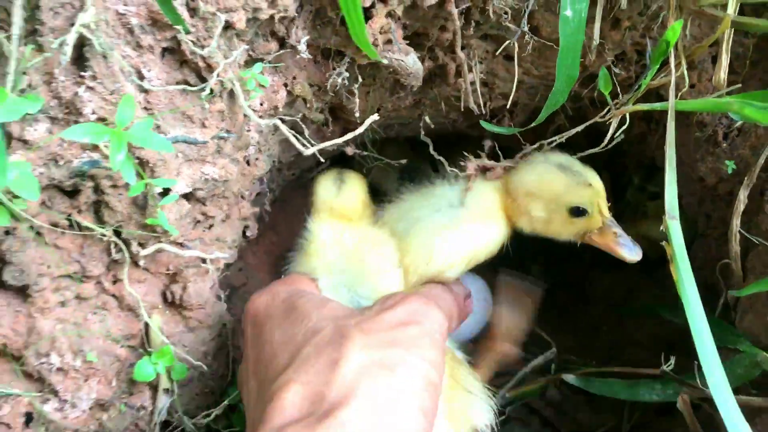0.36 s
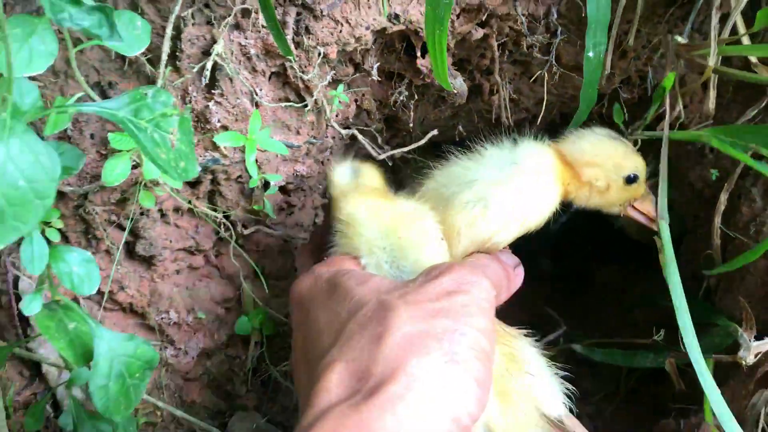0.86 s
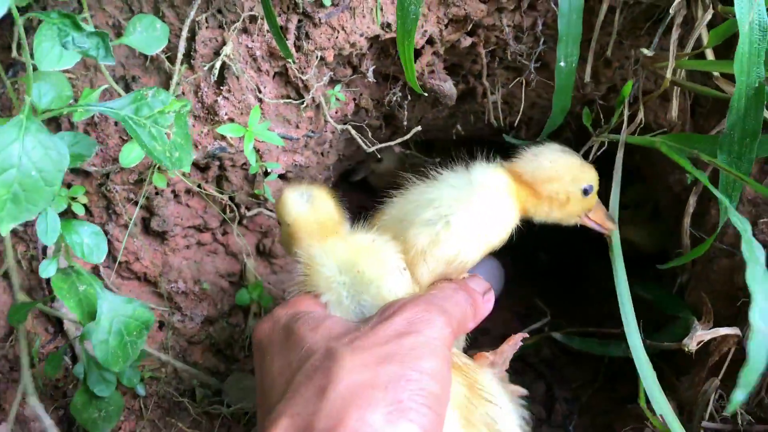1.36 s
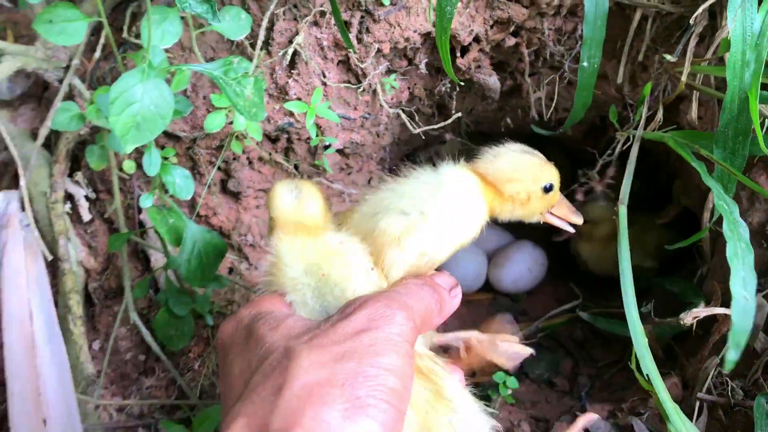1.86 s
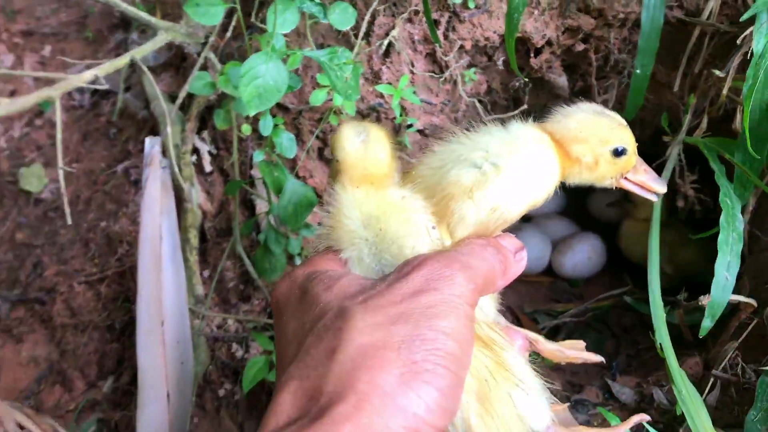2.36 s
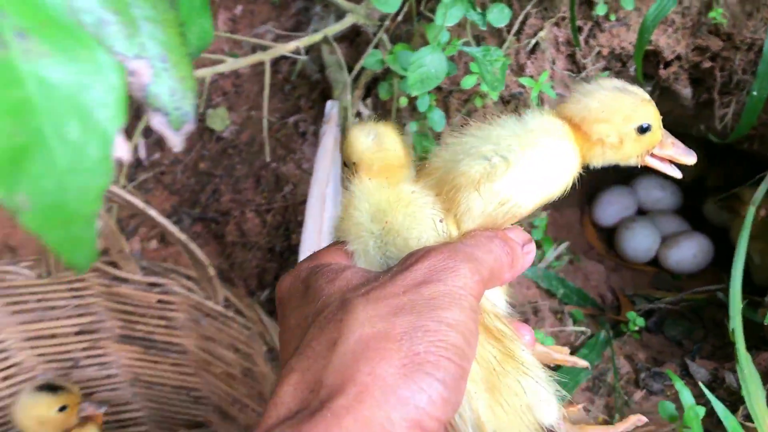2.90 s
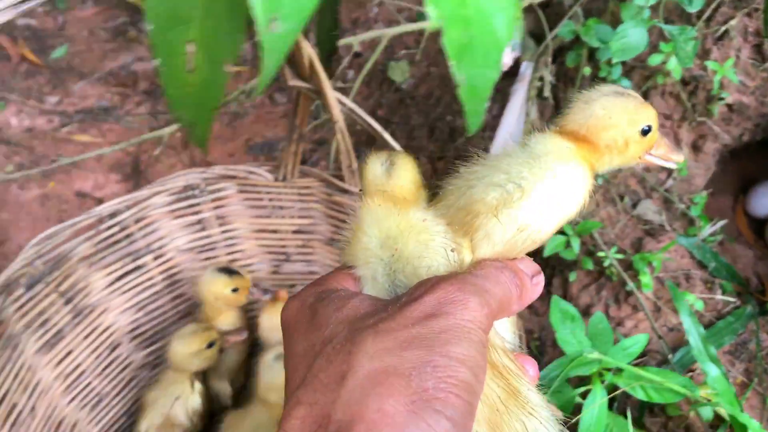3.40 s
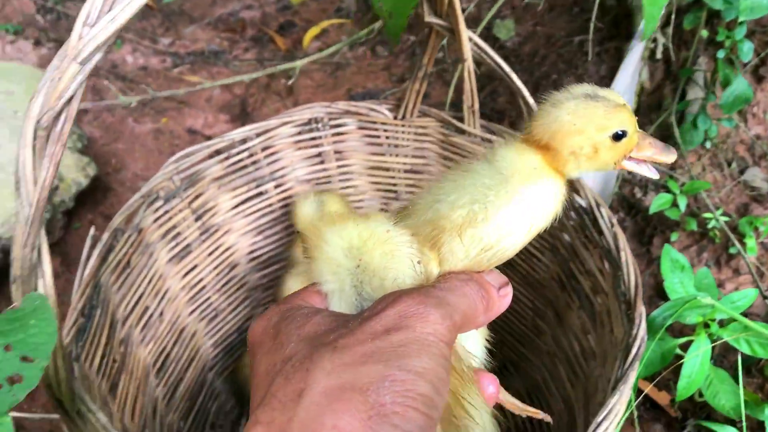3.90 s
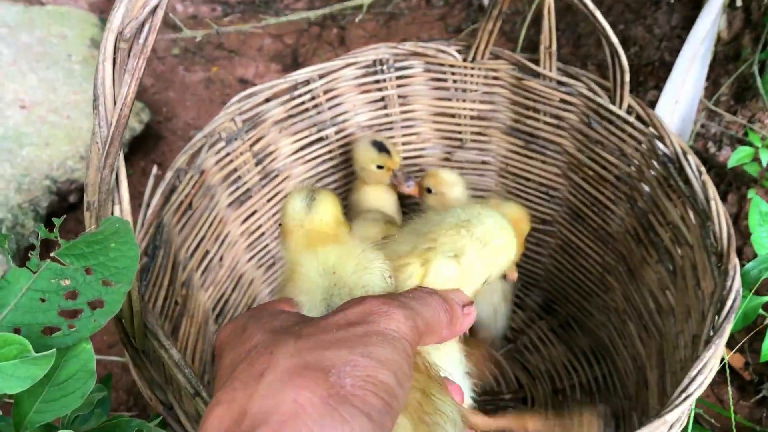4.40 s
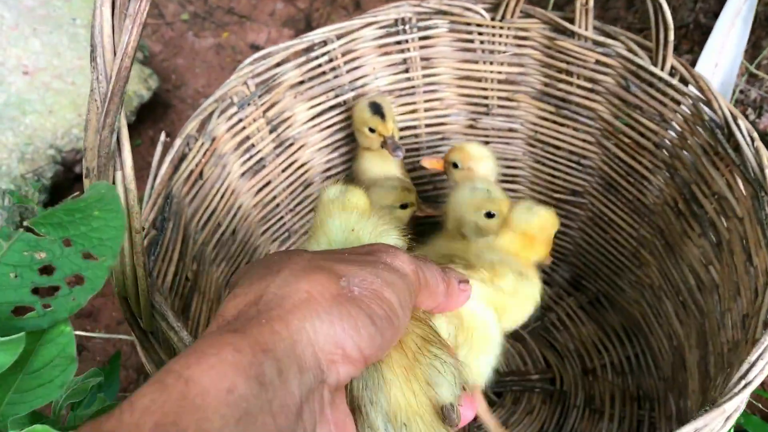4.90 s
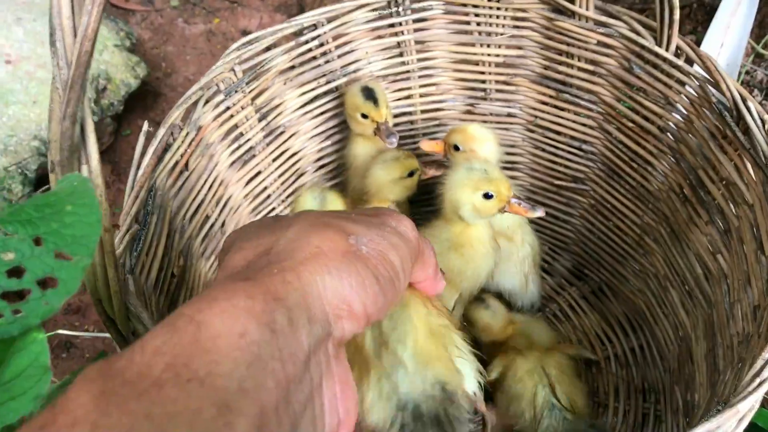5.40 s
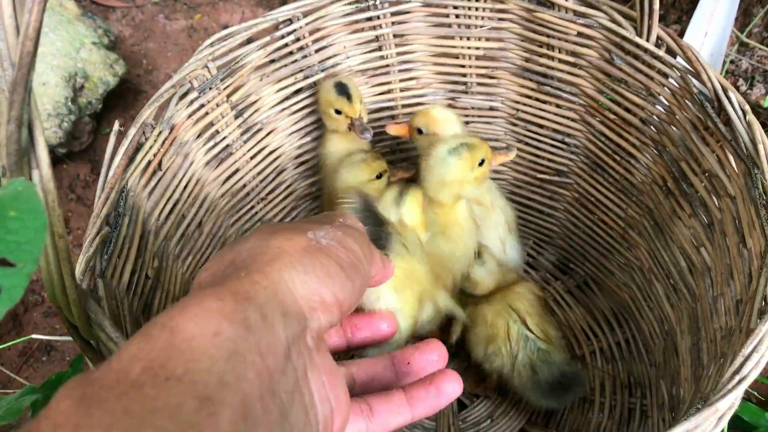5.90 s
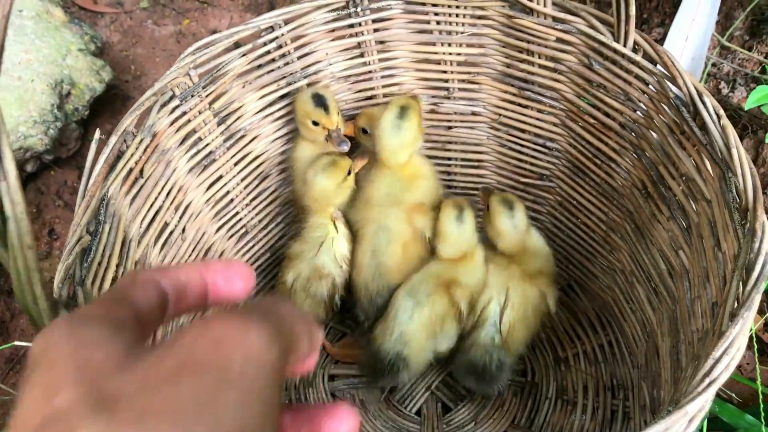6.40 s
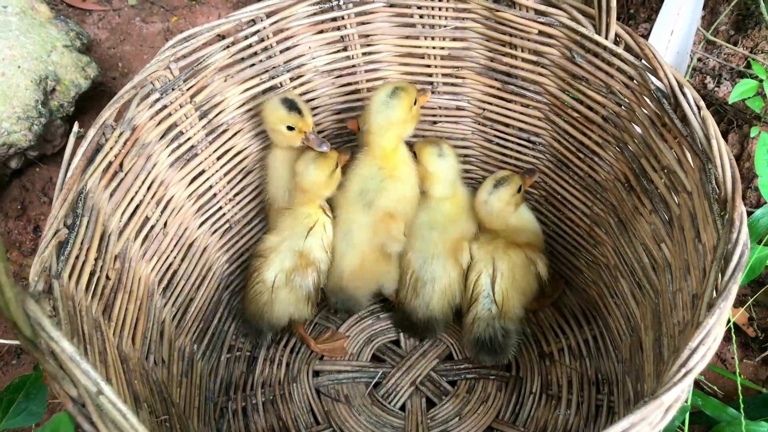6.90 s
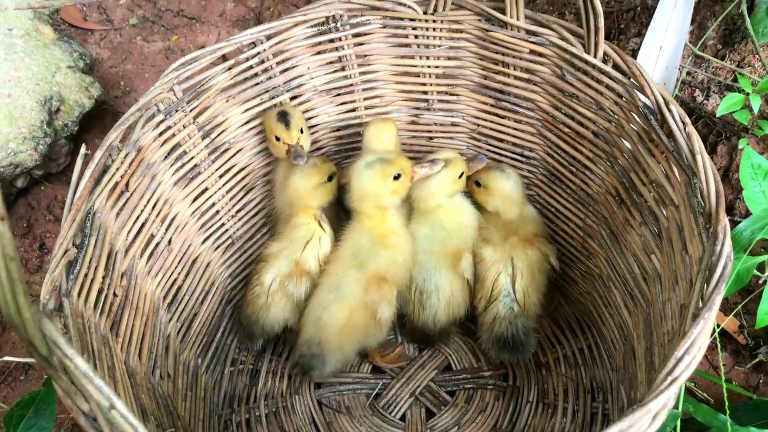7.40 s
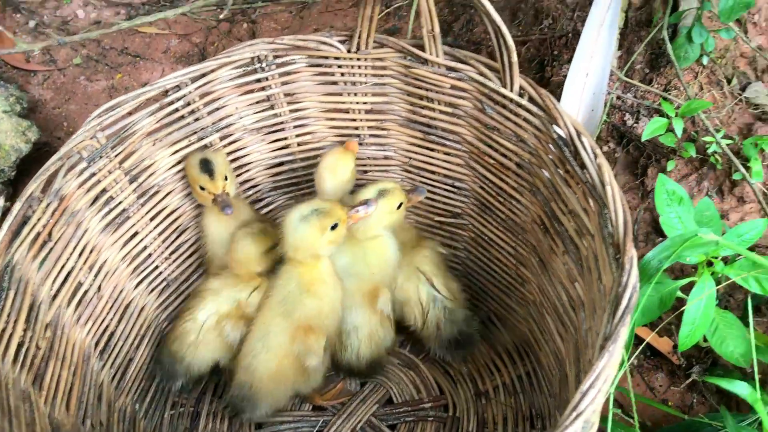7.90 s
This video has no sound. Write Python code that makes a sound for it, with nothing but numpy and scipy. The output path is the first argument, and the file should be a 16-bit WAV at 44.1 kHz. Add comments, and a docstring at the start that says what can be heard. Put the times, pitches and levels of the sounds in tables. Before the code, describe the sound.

Loud, quick duckling peeps alternate high and lower outdoors, with light leaf rustle and wicker ticks, then thin to soft, sparse peeps in quiet air.

```python
"""Ducklings, leaves and wicker

Ducklings peep close by as a hand lifts one from a nest hollow into a wicker basket: gliding near-sines
with a few overtones and puffs of breath. Shaped noise makes the leaf rustle and scraping feet, noise
bursts the ticks and soft knocks. A buzzy bird in the trees is a pulse train through a rising resonance.
Behind lie an engine of summed sines that climbs and lets off, low rumble, airy hiss, blurred far calls
and a faint held tone."""
import sys
import numpy as np
from scipy import signal
from scipy.io import wavfile
from scipy.ndimage import uniform_filter1d, map_coordinates

SR = 44100
rng = np.random.default_rng(int(sys.argv[2]) if len(sys.argv) > 2 else 0)


def volts_from_decibels(level):
    """Turn decibel levels (scalar or array-like) into linear amplitude factors."""
    exponent = np.asarray(level, float) / 20
    return 10 ** exponent


def bounce(signal):
    """Save signal as a 16-bit WAV file at the path given by the first command-line argument."""
    frames = np.transpose(np.atleast_2d(signal))
    limited = np.clip(frames, -1, 1)
    pcm = np.round(limited * 32767).astype(np.int16)
    wavfile.write(sys.argv[1], SR, pcm)


N = 353241  # length in samples

# Held peeps whose pitch sags, then moves to an end pitch; level and pitch before onset and closing shapes:
# [start_s, length_s, level_db, level_change_db, start_hz, sag_hz, end_hz, second_harmonic_db, sag_share]
# sag_share is the share of the length at which the sag is reached
SAGGING_PEEPS = [(0.0, 0.099, -37.5, -5, 3880, 3393, 3800, -22, 0.45),
                 (0.165, 0.089, -59, -15, 3800, 3020, 2900, -16, .45),
                 (0.279, 0.12, -33.5, -3, 4050, 3305, 3635, -21, 0.33),
                 (0.471, 0.076, -47, -5, 3870, 2870, 2890, -52, 0.39),
                 (0.583, .119, -32, -8.5, 3960, 3470, 3770, -25, 0.48),
                 (0.76, 0.092, -45.5, -21, 4260, 3380, 3270, -35, 0.42),
                 (0.896, 0.13, -32.5, -9, 3920, 3480, 3760, -24.5, 0.63),
                 (1.072, 0.089, -54, 1, 3980, 3150, 3170, -41, .4),
                 (1.209, 0.13, -35, -11, 3960, 3434, 3565, -17, 0.52),
                 (1.523, 0.15, -46, 3, 3870, 3604, 3900, -13.5, 0.47),
                 (1.67, 0.095, -53.5, 7, 4060, 3200, 3500, -22, 0.47),
                 (1.865, 0.14, -34.5, -5.5, 3880, 3607, 3734, -29.5, 0.38),
                 (2.001, 0.077, -50, 3.5, 3967, 3070, 3120, -21, 0.42),
                 (2.194, 0.15, -32.5, -6.5, 3925, 3533, 3780, -19, 0.42),
                 (2.521, 0.15, -38, -7.5, 4080, 3660, 3900, -17.5, 0.41),
                 (2.854, .15, -35, -8.5, 4190, 3596, 3920, -20, 0.35),
                 (3.183, 0.16, -34, -9, 4130, 3600, 3880, -15, 0.39),
                 (3.534, 0.16, -33, -8, 4210, 3630, 3917, -19, 0.28),
                 (3.873, .162, -34, -3.5, 4130, 3560, 3700, -16.5, 0.39),
                 (4.067, .102, -59, 10, 4260, 3660, 3400, -13, .32),
                 (4.21, 0.14, -32, -21.5, 4005, 3405, 3280, -20, 0.5),
                 (4.395, 0.11, -38.5, -19, 4190, 3420, 3280, -13, .45),
                 (4.73, .11, -34, -24, 4120, 3460, 3520, -4, 0.55),
                 (5.032, 0.12, -30.5, -11.5, 4230, 3687, 3710, -4, 0.55),
                 (5.345, 0.12, -30.5, -8.5, 4285, 3714, 3795, -3.5, 0.39),
                 (5.675, .122, -28.5, -6, 4140, 3787, 3910, -8, 0.43),
                 (5.981, .13, -36.5, -5.5, 4220, 3780, 3740, -11, 0.39)]
# A softer, lower duckling in the basket, same columns
SOFT_PEEPS = [(6.423, .11, -49, -1.5, 3090, 2855, 2950, -33, 0.49),
              (6.803, .12, -47.5, -4.5, 3260, 2846, 3040, -29.5, 0.49),
              (7.143, 0.11, -50, -2, 3210, 2906, 3180, -28.5, 0.35),
              (7.497, 0.12, -48.5, -3, 3370, 3050, 3310, -33, .4),
              (7.845, 0.13, -48, 1.5, 3480, 3036, 3376, -30, 0.43)]
# Peeps that scoop up and slide down:
# [start_s, length_s, level_db, level_change_db, start_hz, top_hz, end_hz, second_harmonic_db, settle_share]
# settle_share is the share of the length at which the slide levels off
SCOOPED_PEEPS = [(1.431, 0.12, -43, -4.5, 2380, 3000, 2584, -48, 0.74),
                 (1.753, 0.13, -38.5, -11.5, 2800, 3314, 2845, -13, .6),
                 (2.081, 0.13, -36, -9.5, 2870, 3150, 3020, -17, 0.48),
                 (2.399, 0.14, -36.5, -9.5, 3110, 3353, 3180, -14.5, 0.63),
                 (2.72, 0.1383, -38, -4, 3280, 3510, 3190, -15, 0.58),
                 (3.049, 0.12, -33.5, -16, 3080, 3410, 3050, -19, .7),
                 (5.033, .136, -50.5, -11, 3550, 3660, 3260, -22, .85)]
# Short slurs gliding one way, before the onset shapes:
# [start_s, length_s, level_db, level_change_db, start_hz, end_hz, second_harmonic_db]
SLURRED_PEEPS = [(1.048, 0.022, -63, 12, 3370, 3980, -32), (3.693, 0.051, -60, 5, 3940, 3620, -11),
                 (4.054, 0.036, -65, 3, 4050, 4280, -20), (4.361, 0.025, -65, 0, 3850, 4710, -20),
                 (0.414, .06, -74.5, 26, 2410, 3840, -38), (.72, 0.039, -62, 2, 2900, 4260, -32),
                 (1.404, 0.06, -55, 10.5, 3690, 3140, -41), (2.897, .054, -69, 3, 2580, 2360, -36),
                 (3.41, 0.06, -48.5, -35, 3350, 2560, -5), (3.745, 0.063, -44, -27, 3650, 2260, -13),
                 (4.078, 0.049, -39.5, -33, 3800, 2420, -20), (4.421, .047, -45, -20, 3740, 2530, -12),
                 (4.748, 0.078, -48.5, -17, 3750, 2500, -8), (5.092, 0.06, -44, -30, 3650, 2550, -13),
                 (5.24, 0.036, -63, -6, 3030, 4105, -35), (5.277, .064, -52.5, -2, 4100, 2250, -48),
                 (5.436, 0.059, -36, -38, 3770, 2670, -18), (5.765, 0.071, -36.5, -33, 4100, 2520, -11),
                 (5.79, 0.07, -60, -22, 2440, 2050, -21), (6.125, 0.073, -42, -26, 3590, 2630, -8.5),
                 (6.332, 0.039, -66.5, 8, 2960, 3880, -23), (6.368, 0.047, -45.5, -8.5, 3765, 2480, -28.5),
                 (6.529, 0.052, -39, -33, 3690, 2590, -11)]
# How the open bill lifts or dulls each overtone: [pitch_hz, gain_db]
BILL_COLOUR = [(6000, 3), (7500, -2.5), (9000, -15), (11500, -11.5), (15500, -24)]
# Ticks of feet and twigs, peak of the bright snap: [start_s, peak_db, decay_s]
FOOT_TICKS = [(0.807, -45, 0.0012), (3.258, -43, 0.003), (3.275, -37, 0.0026), (3.522, -43.5, 0.0025),
              (3.9384, -45, 0.0016), (4.524, -48.5, 0.0049), (4.6163, -48, 0.0071), (4.9554, -46, 0.0067),
              (5.1715, -38, 0.0019), (5.307, -43.5, 0.003), (5.8555, -51.5, 0.006), (6.158, -40.5, 0.0036),
              (6.232, -43.5, 0.0017), (6.38, -50, 0.0034), (6.412, -42.5, 0.0059), (6.516, -46, 0.0051),
              (6.583, -45, 0.006), (6.719, -49.5, 0.0037), (7.125, -45.5, 0.0051), (7.351, -50, 0.0036),
              (7.364, -41, 0.0031), (7.382, -46.5, 0.002), (7.818, -47.5, 0.0039)]
# Feet scraping over the wicker, level before flutter and fades: [start_s, length_s, level_db]
WICKER_SCRAPES = [(5.194, 0.017, -51.5), (5.223, 0.017, -60.5), (5.375, 0.032, -60), (6.107, 0.052, -57)]
# Leaves and down brushed by the hand, level before the crackle: [time_s, level_db]
RUSTLE_LEVEL = [(0, -65), (.25, -60.5), (.4, -63), (.68, -63), (.78, -52.5), (1, -53), (1.12, -61),
                (1.25, -69), (1.74, -64), (2.32, -66.5), (2.8, -64), (3.45, -63.5), (3.9, -71),
                (5.4, -72.5), (6.7, -67.5), (6.9, -70.5), (8.01, -72.5)]
# Relative spectrum of the rustle: [frequency_hz, density_db_per_hz]
LEAF_COLOUR = [(300, -1), (450, -6), (1400, 1), (2600, 0), (4000, -2), (7000, -4), (10000, -5.5),
               (12500, 0), (14500, -10), (16000, -50)]
# Distant engine: [time_s, cycle_hz, second_order_db, upper_orders_db]
ENGINE_COURSE = [(0, 22.2, -57.5, -61), (1.2, 19.3, -55.5, -58), (1.7, 30.4, -55.5, -63),
                 (3, 23.9, -67, -65), (4, 25.4, -63, -63), (4.55, 29.6, -59.5, -61.5),
                 (5.15, 30.6, -55.5, -62), (5.6, 33.1, -56, -63.5), (5.8, 32.4, -85, -71),
                 (6.5, 14.2, -74, -64)]
# Balance of the engine's upper orders before they waver: [multiple_of_cycle, relative_db]
UPPER_ORDERS = [(3, -8), (4, 0), (5, -2.5), (6, -22.5)]
# Outdoor rumble, reference for its two layers: [time_s, level_db]
RUMBLE_LEVEL = [(0, -53.5), (1.5, -55.5), (2.5, -56.5), (4, -60.5), (5.8, -59), (8.01, -63)]
# Relative spectrum of the background air: [frequency_hz, density_db_per_hz]
AIR_COLOUR = [(25, -58), (59, 6), (120, 2), (217, -10), (394, -12.5), (818, -25.5), (3250, -34),
              (5000, -50.5), (8300, -35), (9300, -17.5), (10400, -48.5), (11500, -15.5), (13000, -45),
              (16000, -27)]
# Soft low knocks of the hand on soil and basket: [start_s, peak_db, resonance_hz]
HAND_KNOCKS = [(1.457, -54, 1240), (1.89, -56, 347), (1.942, -52.5, 368), (2.729, -57, 360),
               (3.583, -55, 1200), (3.96, -56.5, 393), (5.166, -56, 1390), (5.199, -63, 439),
               (5.392, -65, 657)]
# Faint far calls smeared into hiss, level before the swell: [start_s, length_s, centre_hz, level_db]
FAR_CALL_BANDS = [(2.451, 0.4, 1650, -71), (2.847, 0.22, 1190, -72.5), (6.198, 0.19, 1730, -75),
                  (6.541, 0.16, 1830, -69), (6.851, 0.28, 1870, -70), (7.198, .3, 2010, -70),
                  (7.68, 0.28, 2010, -72.5)]
# Buzzy bird in the trees, level before the swell: [start_s, level_db, start_hz, end_hz, length_s]
BIRD_CHIRPS = [(2.658, -49, 2420, 3060, 0.056), (2.955, -44.5, 2020, 2960, 0.067),
               (3.277, -42.5, 2180, 2750, 0.066)]

LEAD_S = 0.006  # air flows before the tone takes hold


def curve(rows, t):
    """Columns of a table read at times t."""
    s, *columns = np.transpose(rows)
    return [np.interp(t, s, c) for c in columns]


def read(points, hz):
    """A spectrum read on a log-frequency axis."""
    f, value = np.transpose(points)
    return np.interp(np.log(hz + 1), np.log(f + 1), value)


def evened(x):
    """Scaled to rms 1."""
    return x / np.sqrt(np.mean(x ** 2) + 1e-20)


def add(mix, s, sound):
    """Mixes a sound in at time s."""
    part = mix[round(s * SR):][:len(sound)]
    part += sound[:len(part)]


def drift(size, hz):
    """Random wavering of rms 1: noise low-passed at hz."""
    lowpass = signal.butter(2, hz, fs=SR, output="sos")
    return evened(signal.sosfilt(lowpass, rng.standard_normal(size + SR))[SR:])


def resonate(x, hz, width):
    """A resonance of gain 1 that can move: shift hz down to zero, smooth, shift back up."""
    turn = np.exp(2j * np.pi * np.cumsum(hz * np.ones(len(x))) / SR)
    r = np.exp(-np.pi * width / SR)
    return 2 * (turn * signal.lfilter([1 - r], [1, -r], x / turn)).real


def hiss(colour, patchy_db):
    """Noise of a given spectrum with drifting patches, rms 1."""
    hz = np.fft.rfftfreq(1024, 1 / SR)
    a, b, patches = rng.standard_normal((N // 256 + 5, 513, 3)).T
    patches = uniform_filter1d(patches, size=12, axis=0)
    patches = evened(uniform_filter1d(patches, size=10, axis=1))
    z = (a + 1j * b) * volts_from_decibels(read(colour, hz)[:, None] + patchy_db * patches)
    return evened(signal.istft(z, nperseg=1024, noverlap=768)[1][:N])


def echoes(x, t60, delay_s):
    """Scattered reflections: a decaying noise tail of energy 1."""
    t = np.arange(SR // 2) / SR
    tail = rng.standard_normal(len(t)) * volts_from_decibels(-60 * t / t60) * (t > delay_s)
    return signal.fftconvolve(x, tail / np.linalg.norm(tail))[:N]


def held(s, length, level_db, change_db, start_hz, turn_hz, end_hz, second_db, at, reach, bend, drop, rest_hz):
    """Pitch and level of a held call: curve to the turn, ease to the end pitch, collapse as the syrinx shuts."""
    t = np.arange(-min(LEAD_S, s), length, 1 / SR)
    u, left = np.clip(t / length, 0, 1), length - t
    ease = np.clip((u - at) / (reach - at), 0, 1)
    moved = np.sin(np.pi / 2 * ease) ** 2
    to_turn = np.clip(1 - u / at, 0, 1) ** (bend / at)  # steeper the earlier the turn
    hz = turn_hz + (start_hz - turn_hz) * to_turn + (end_hz - turn_hz) * moved
    # starts above the rest pitch are flicked in from higher, those below scooped in from lower
    hz += 1.33 * (start_hz - rest_hz) * np.exp(-u * length / 0.00422)
    shoulder = 0.2  # this share of the collapse comes a little earlier
    hz *= 1 - drop * ((1 - shoulder) * np.exp(-left / 0.00377) + shoulder * np.exp(-left / 0.0138))

    swell_s = 0.003 + 0.11 * at * length  # longer the later the pitch turns
    shape_db = -13.5 * np.exp(-u * length / swell_s)
    shape_db += -8.5 * np.exp(-left / 0.0055)  # shutting
    shape_db += 1.5 * np.sin(np.pi * u)  # effort is greatest mid-call
    move_khz = abs(end_hz - turn_hz) / 1000
    # a last push of air just before the close, after a wide move of pitch
    shape_db += 19 * move_khz * np.exp(-((left - 0.015) / 0.0019) ** 2)
    # the level slackens while the pitch moves from the turn to the end
    shape_db -= 10.5 * move_khz * np.sin(np.pi * ease) ** 2
    return s + t, s, hz, level_db + change_db * u ** 0.95 + shape_db, second_db


def slur(s, length, level_db, change_db, start_hz, end_hz, second_db):
    """Pitch and level of a short bent glide, entered from just below."""
    t = np.arange(-LEAD_S, length, 1 / SR)
    u = np.clip(t / length, 0, 1)
    hz = end_hz + (start_hz - end_hz) * (1 - u) ** 1.4
    hz -= 0.067 * start_hz * np.exp(-u * length / 0.0054)
    level_db = level_db + change_db * u - 10 * np.exp(-u * length / 0.002)
    return s + t, s, hz, level_db, second_db


def calls():
    """Every duckling call as times, start, pitch, level and second-harmonic level."""
    drop = 0.431  # share of the pitch lost in the closing collapse
    sagging = [held(*row, reach=0.78, bend=0.79, drop=drop, rest_hz=3980) for row in SAGGING_PEEPS]
    soft = [held(*row, reach=0.93, bend=0.79, drop=0.21, rest_hz=3000) for row in SOFT_PEEPS]
    # a scoop rests at its own start pitch, so it gets no entry flick
    scooped = [held(*row[:-1], at=0.1167, reach=row[-1], bend=0.164, drop=drop, rest_hz=row[4])
               for row in SCOOPED_PEEPS]
    return sagging + soft + scooped + [slur(*row) for row in SLURRED_PEEPS]


def ducklings():
    """Each peep is a near sine with a few overtones and a breathy start; level and pitch waver slightly."""
    out = np.zeros(N)
    waver, shake, air = drift(N, hz=46.6), drift(N, hz=143), rng.standard_normal(N)
    flicker_db = 3 * drift(N + SR, hz=25)  # overtones come and go as the throat shifts
    wobble = 1 + 0.002 * drift(N, hz=35)
    for t, s, hz, level_db, second_db in calls():
        first, size = round(t[0] * SR), len(t)
        phase = 2 * np.pi * np.cumsum(hz * wobble[first:][:size]) / SR
        voice = np.sin(phase)
        closing_db = -5 * np.linspace(-0.5, 0.5, size)  # all overtones dull as the bill closes
        for k, db in zip((2, 3, 4), (0, -8, -14)):
            # higher overtones follow the brightness of a peep only in part
            own_db = second_db * 0.58 ** (k - 2) + db + read(BILL_COLOUR, k * hz) + closing_db
            own_db = own_db + flicker_db[first + k * 999:][:size]
            voice += (k * hz < SR / 2) * volts_from_decibels(own_db) * np.sin(k * phase)
        u = (t - s + LEAD_S) / LEAD_S
        breath = resonate(air[first:][:size], hz * 0.98, 1300)
        breath = evened(resonate(breath, hz * 1.37, 1360)) * u * np.exp(1 - u)
        onset = np.sin(np.pi / 2 * np.minimum(u / np.e, 1)) ** 2
        sound = np.sqrt(2) * volts_from_decibels(level_db) * voice * onset + volts_from_decibels(level_db.max() - 22) * breath
        add(out, t[0], sound * signal.windows.tukey(size, 0.06))
    slip = np.cumsum(0.0025 * shake)  # tiny quick slips of pitch, as shifts in samples
    slip -= uniform_filter1d(slip, size=2000)
    near = map_coordinates(out * volts_from_decibels(1.1 * waver), [np.arange(N) + slip], order=3)
    return near + volts_from_decibels(-21) * echoes(near, t60=0.13, delay_s=0.004)


def tick(knock_hz, decay_s):
    """A sharp bright snap with a short woody knock under it, both from one noise burst."""
    t = np.arange(1500) / SR
    snap = rng.standard_normal(len(t)) * np.exp(-t / decay_s)
    band = signal.butter(2, [5000, 13000], "band", fs=SR, output="sos")
    bright = signal.sosfilt(band, snap)
    knock = resonate(snap, knock_hz, 1070)
    return bright / abs(bright).max() + volts_from_decibels(-3) * knock / abs(knock).max()


def handling():
    """Single ticks, wicker scrapes, many faint random ticks, and a rustle of grainy noise."""
    out = np.zeros(N)
    for s, peak_db, decay_s in FOOT_TICKS:
        add(out, s, volts_from_decibels(peak_db) * tick(3350, decay_s))
    leaves = hiss(LEAF_COLOUR, patchy_db=1.1)
    for s, length, level_db in WICKER_SCRAPES:
        stroke = leaves[:round(length * SR)]
        flutter_db = 3 * drift(len(stroke), hz=150)
        add(out, s, volts_from_decibels(level_db + flutter_db) * stroke * signal.windows.tukey(len(stroke), 0.5))
    # about 34 faint ticks a second, drawn from eight kinds
    size = volts_from_decibels(5 * np.minimum(rng.exponential(1, N), 3)) * (rng.random(N) < 34 / SR)
    kind = rng.integers(0, 8, N)
    for k in range(8):
        one_kind = tick(rng.uniform(1500, 5000), 0.004)
        out += volts_from_decibels(-66) * signal.oaconvolve(size * (kind == k), one_kind)[:N]
    level = volts_from_decibels(curve(RUSTLE_LEVEL, np.arange(N) / SR)[0])
    grain = volts_from_decibels(2.8 * drift(N, hz=185))  # leaves crackle in clumps
    return out + level * leaves * grain


def engine():
    """Low orders of the firing cycle, the upper ones wavering over distance; it fades as it lets off."""
    t = np.arange(N) / SR
    hz, second_db, upper_db = curve(ENGINE_COURSE, t)
    phase = 2 * np.pi * np.cumsum(hz) / SR
    upper = np.zeros(N)
    for k, db in UPPER_ORDERS:
        upper += volts_from_decibels(db + 3.7 * drift(N, hz=1.65)) * np.sin(k * phase + 7 * rng.random())
    orders = volts_from_decibels(second_db) * np.sin(2 * phase) + volts_from_decibels(upper_db) * upper
    fade = np.clip((ENGINE_COURSE[-1][0] - t) / 0.23, 0, 1)  # silent from the last row on
    return np.sqrt(2) * orders * fade


def rumble():
    """Far traffic: band-passed low noise with a soft hum, a narrow resonance of the same noise."""
    noise = rng.standard_normal(N)
    band = signal.butter(3, [55, 160], "band", fs=SR, output="sos")
    low = evened(signal.sosfilt(band, noise))
    hum = evened(resonate(noise, 69.1, 10.3))
    level = volts_from_decibels(curve(RUMBLE_LEVEL, np.arange(N) / SR)[0])
    return level * (volts_from_decibels(-13) * low + volts_from_decibels(-4.5) * hum)


def background_air():
    """A steady bed of shaped noise with slight drifting patches."""
    return volts_from_decibels(-63) * hiss(AIR_COLOUR, patchy_db=0.5)


def thumps():
    """Short puffs of noise in a broad low resonance, applied twice."""
    out, t = np.zeros(N), np.arange(3000) / SR
    for s, peak_db, hz in HAND_KNOCKS:
        puff = rng.standard_normal(len(t)) * t * np.exp(-t / 0.0054)
        knock = resonate(resonate(puff, hz, 500), hz, 500)
        add(out, s, volts_from_decibels(peak_db) * knock / abs(knock).max())
    return out


def far_calls():
    """Fuzzy bands of noise that swell, glide up and sink."""
    out = np.zeros(N)
    for s, length, hz, level_db in FAR_CALL_BANDS:
        noise = rng.standard_normal(SR // 2)[:round(length * SR)]
        glide = hz * np.linspace(0.93, 1.07, len(noise))
        band = evened(resonate(resonate(noise, glide, 300), glide, 400))
        add(out, s, volts_from_decibels(level_db) * band * np.hanning(len(noise)) ** 0.5)
    return out


def tree_bird():
    """Uneven fast pulses with puffs of noise ring a rising resonance; the trees throw back a long tail."""
    out = np.zeros(N)
    for s, level_db, start_hz, end_hz, length in BIRD_CHIRPS:
        t = np.arange(0, length, 1 / SR)
        chance = rng.standard_normal((2, len(t)))
        uneven = 1 + 0.5 * uniform_filter1d(chance[0], size=150)
        turns = np.cumsum(270 * uneven) / SR  # mean pulse rate in Hz
        puffs = 0.3 * chance[1] * np.exp(-(turns % 1) / 0.37)  # hoarseness after each pulse
        pulses = evened(np.diff(np.floor(turns), prepend=-1)) + puffs
        hz = end_hz + (start_hz - end_hz) * np.exp(-t / 0.017)
        buzz = evened(resonate(resonate(pulses, hz, 430), hz, 170))
        add(out, s, volts_from_decibels(level_db) * buzz * np.sin(np.pi * t / length))
    return out + volts_from_decibels(-4) * echoes(out, t60=0.38, delay_s=0.0035)


def far_tone():
    """A faint held tone from far off, perhaps a horn: only a few overtones of 192 Hz carry."""
    t = np.arange(N) / SR
    stack = sum(np.sin(2 * np.pi * k * 192 * t) for k in (4, 7, 8))
    return volts_from_decibels(-84) * stack * np.clip((t - 7.1) * 20, 0, 1)  # enters at 7.1 s over 0.05 s


def scene():
    """All sources, one microphone."""
    close = ducklings() + handling() + thumps()
    far = engine() + rumble() + background_air() + far_calls() + tree_bird() + far_tone()
    return (close + far)[None]


def top_cut(x):
    """Nothing passes above the cut-off."""
    return signal.sosfilt(signal.butter(12, 16420, fs=SR, output="sos"), x)


def record(dry):
    """The microphone chain rolls off the very top with a steep low-pass."""
    edge = signal.firwin(255, 15950, window=("kaiser", 9), fs=SR)
    mix = signal.oaconvolve(dry, edge[None], "same")
    return top_cut(mix)


dry = scene()
out = record(dry)
bounce(out)
```